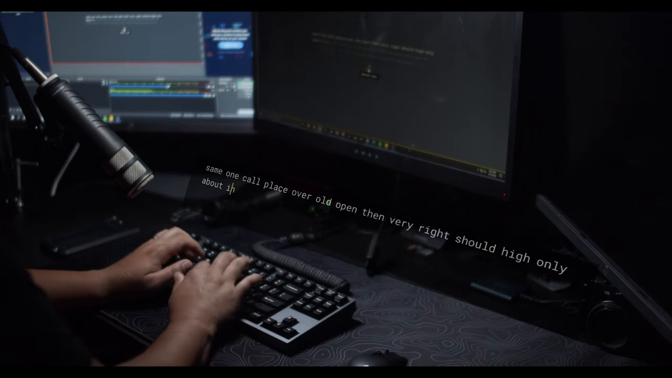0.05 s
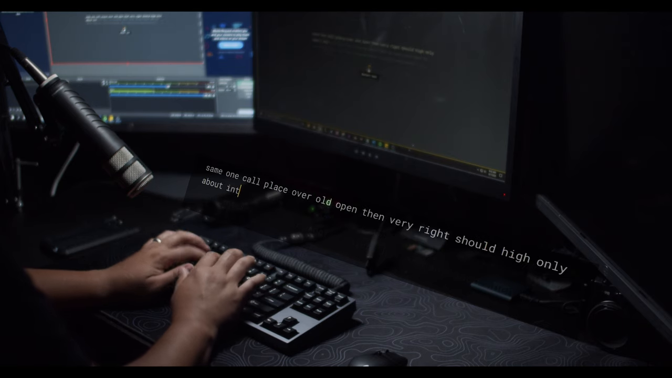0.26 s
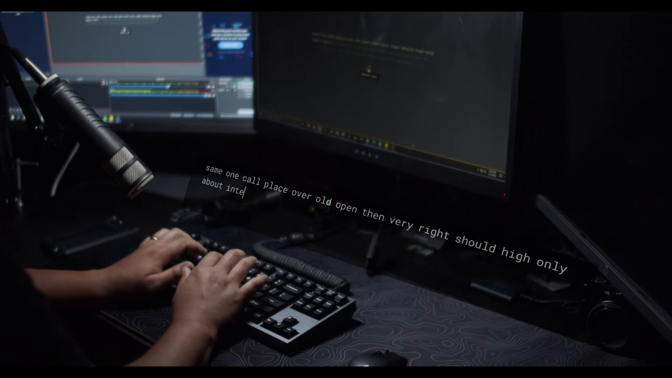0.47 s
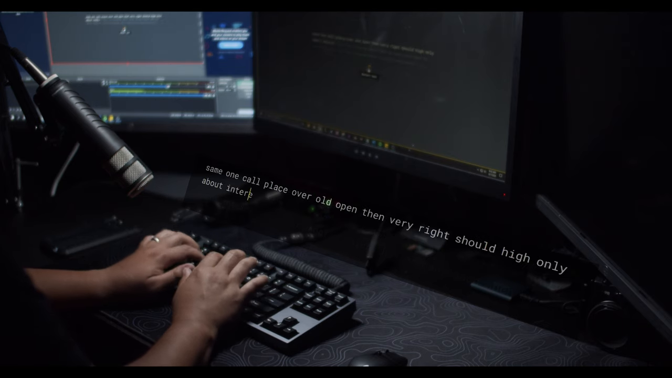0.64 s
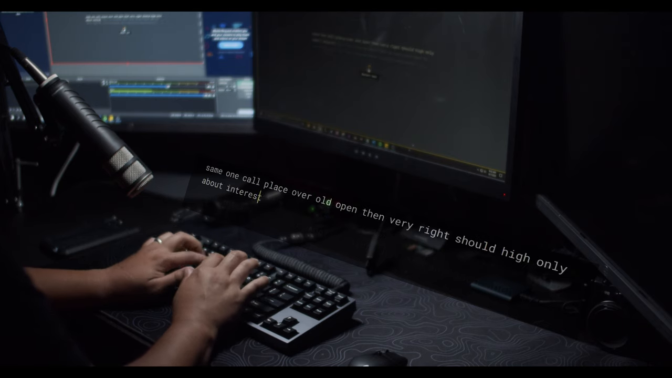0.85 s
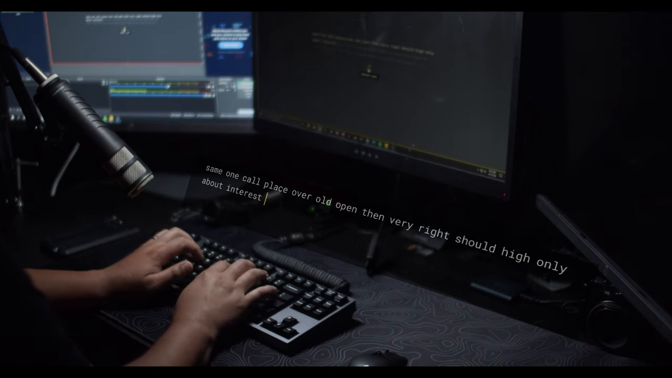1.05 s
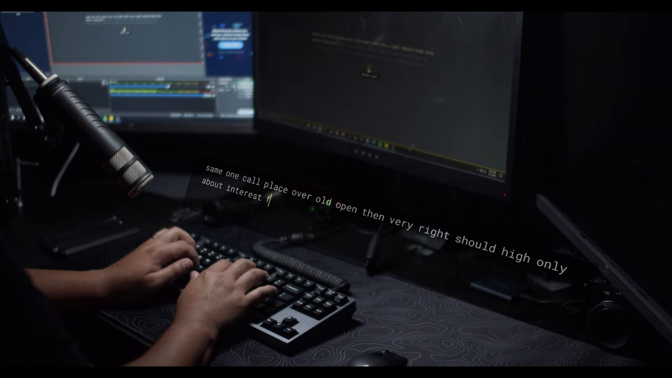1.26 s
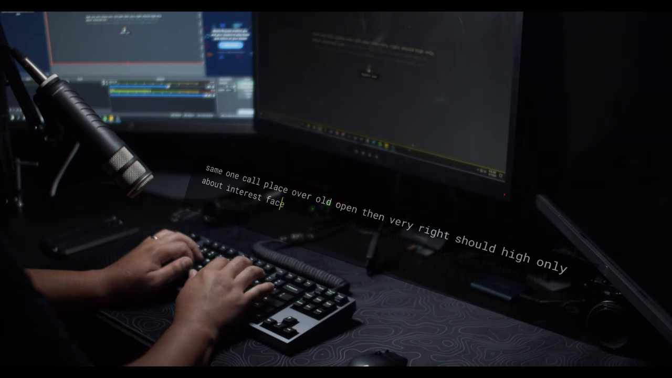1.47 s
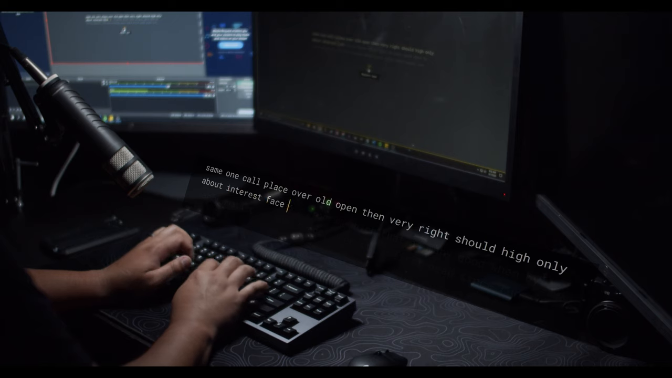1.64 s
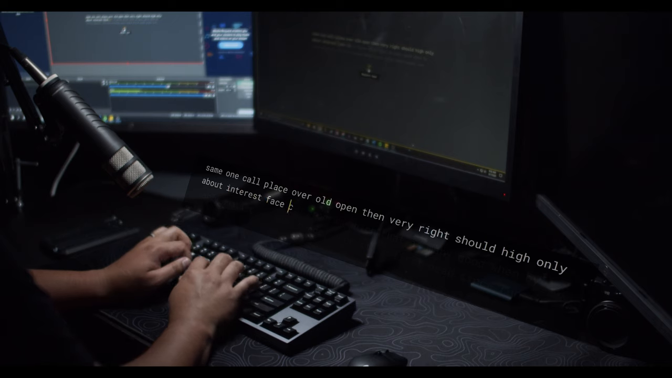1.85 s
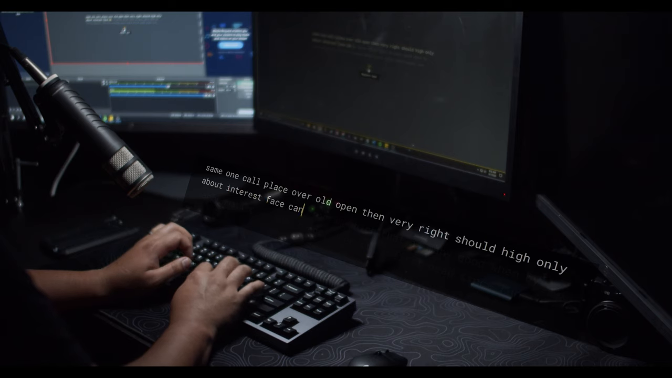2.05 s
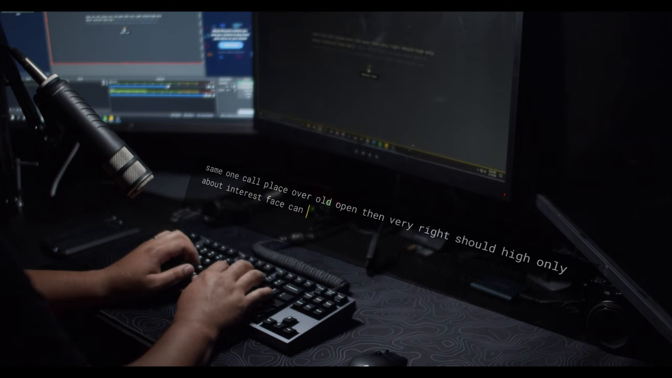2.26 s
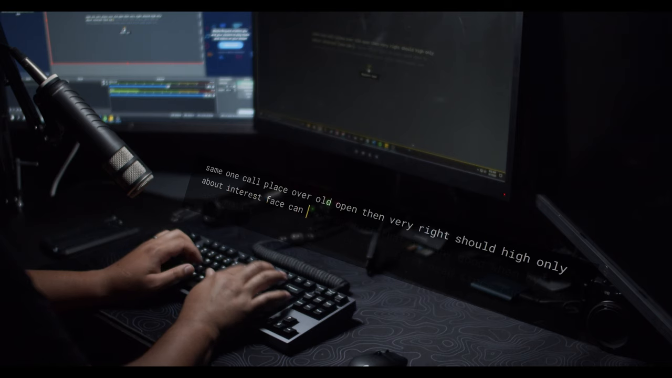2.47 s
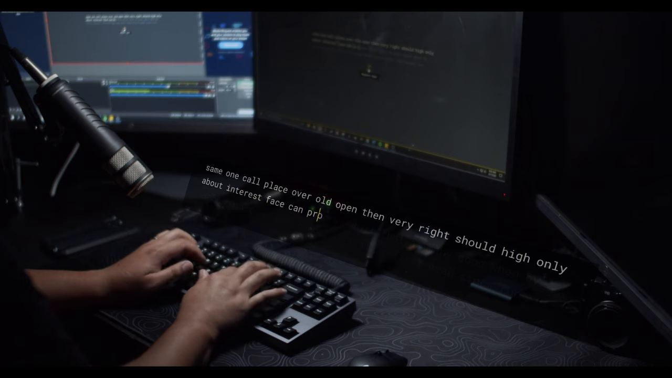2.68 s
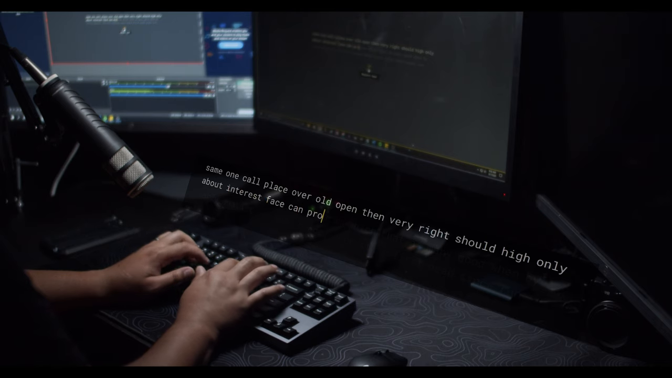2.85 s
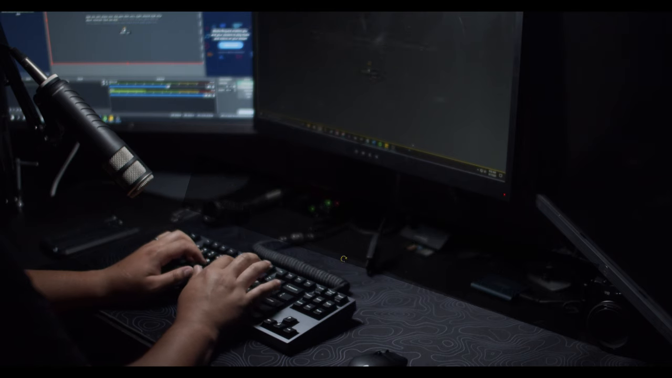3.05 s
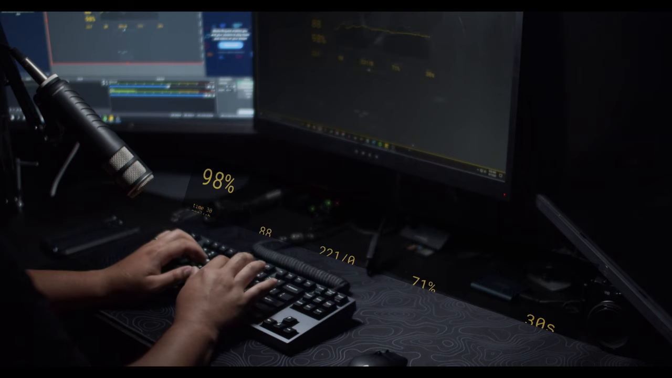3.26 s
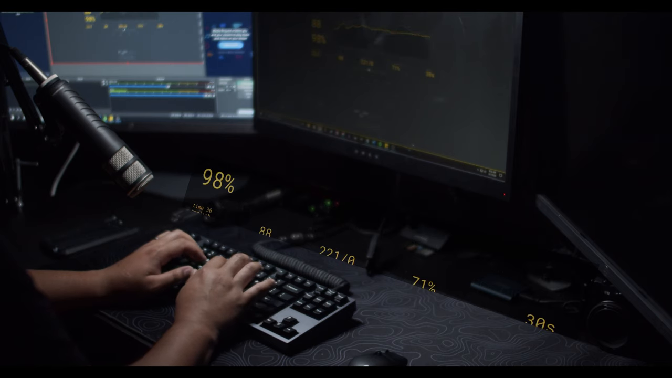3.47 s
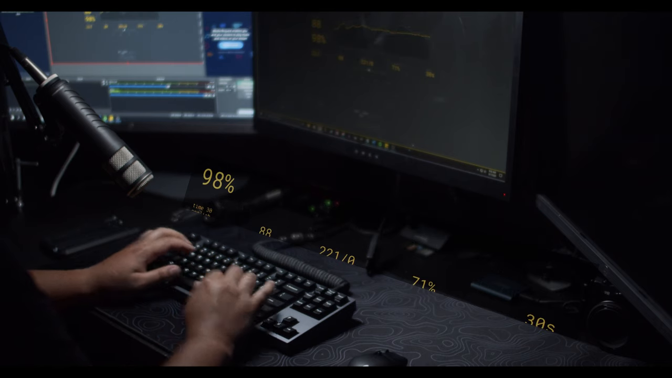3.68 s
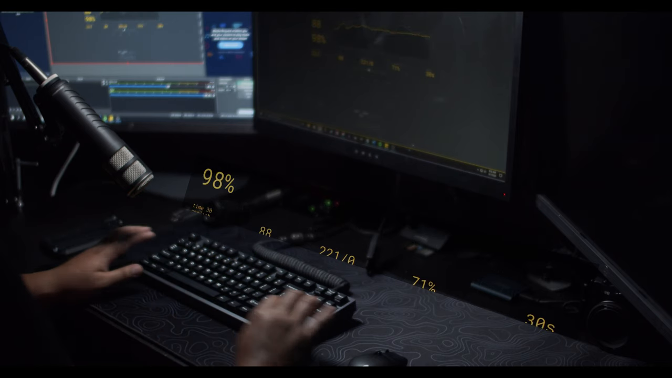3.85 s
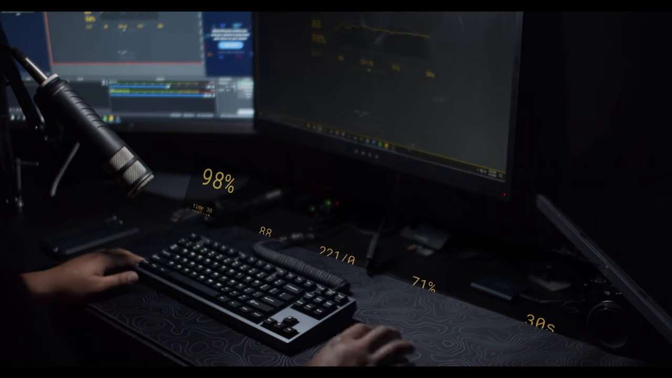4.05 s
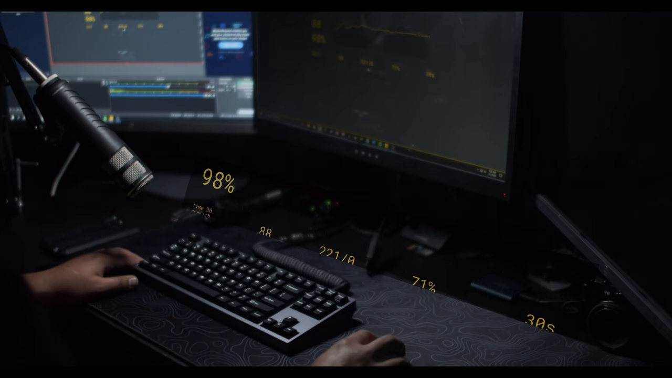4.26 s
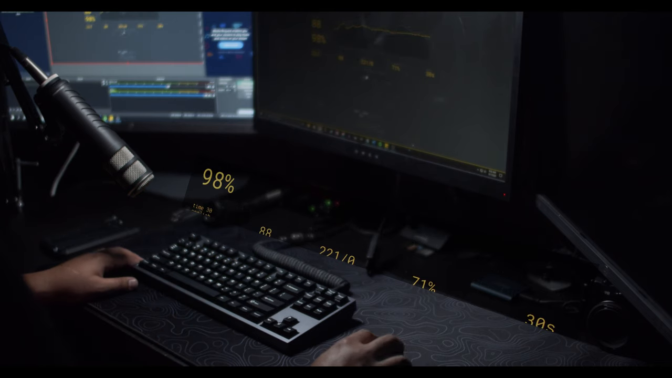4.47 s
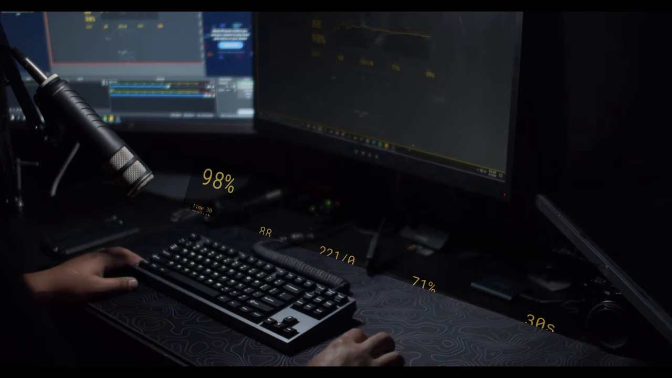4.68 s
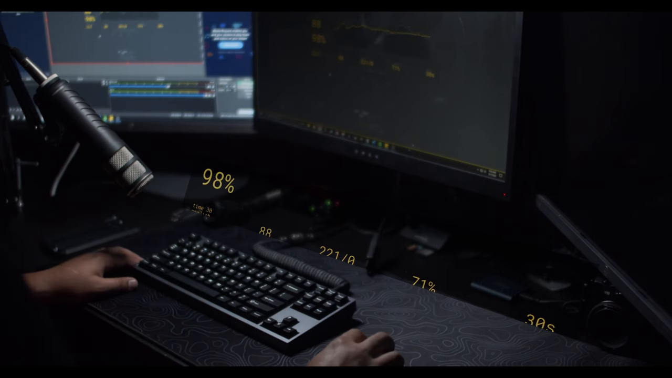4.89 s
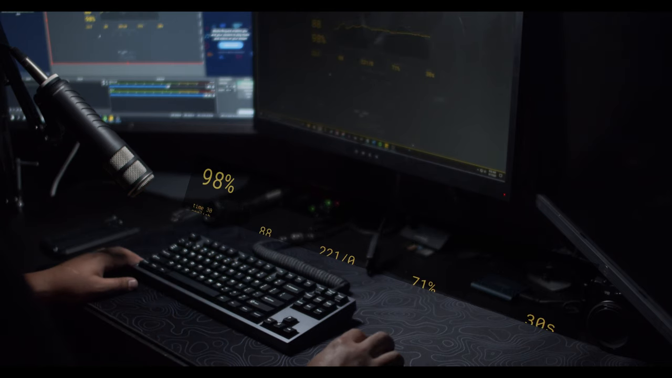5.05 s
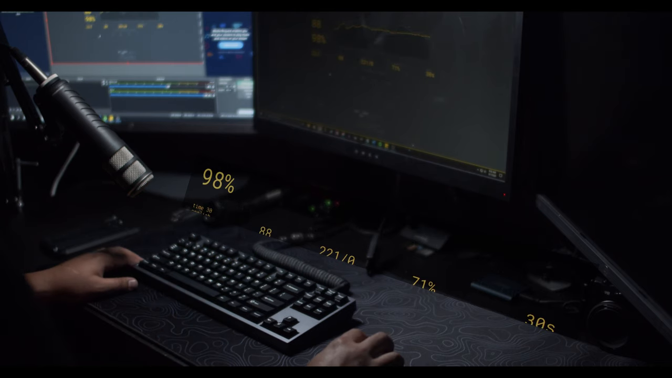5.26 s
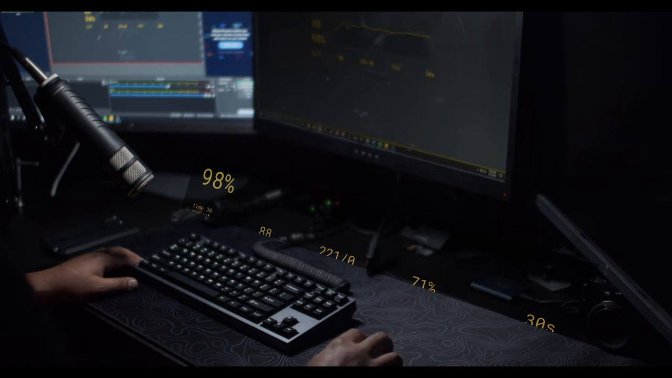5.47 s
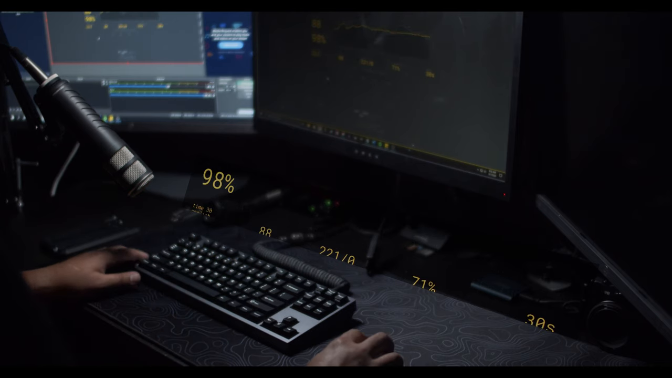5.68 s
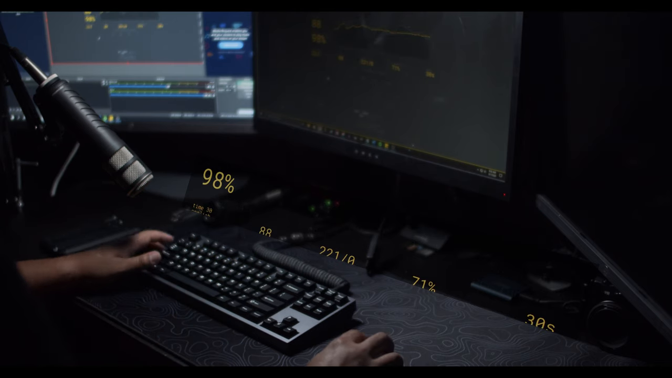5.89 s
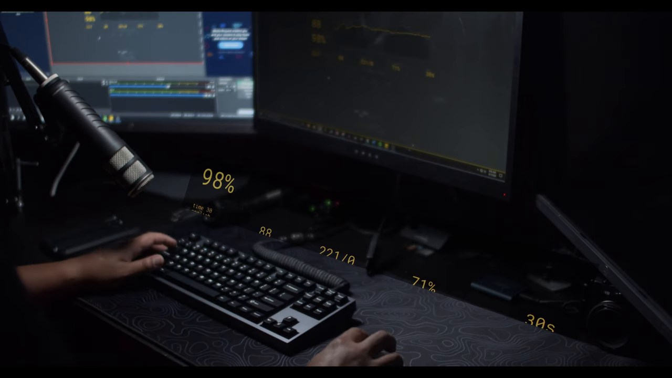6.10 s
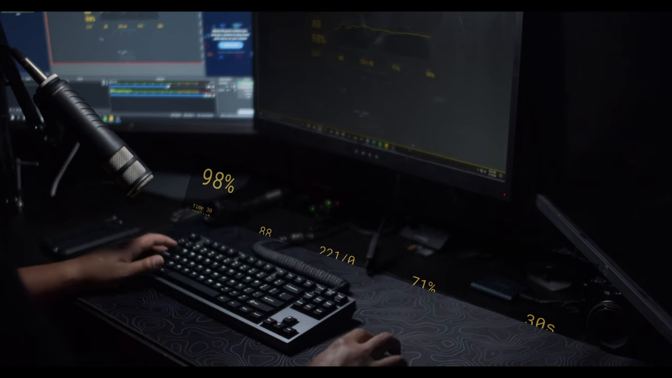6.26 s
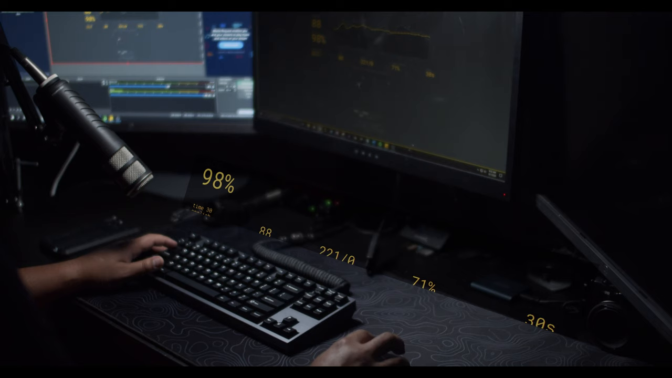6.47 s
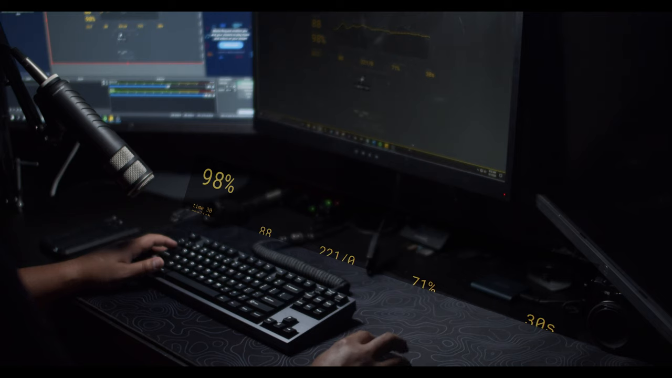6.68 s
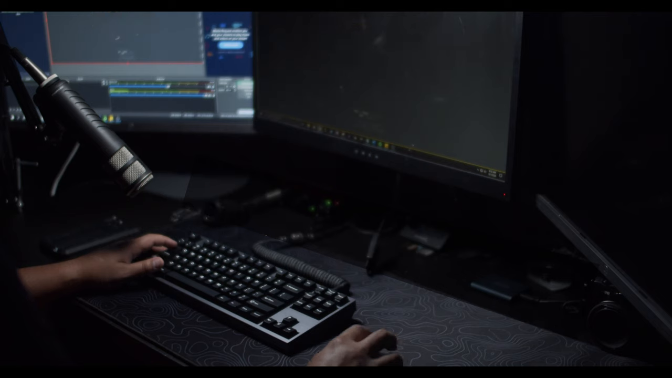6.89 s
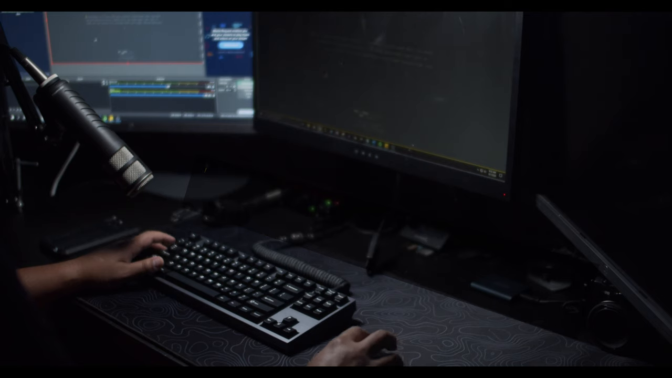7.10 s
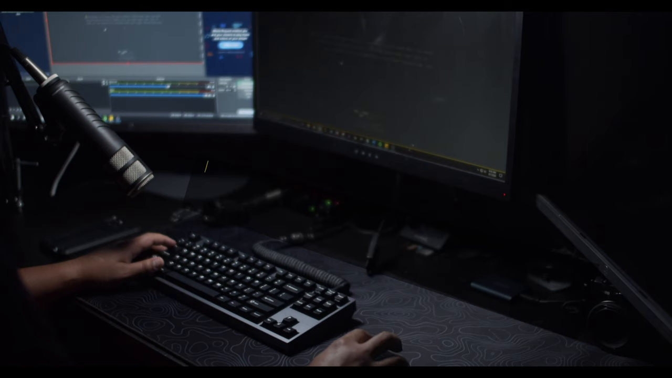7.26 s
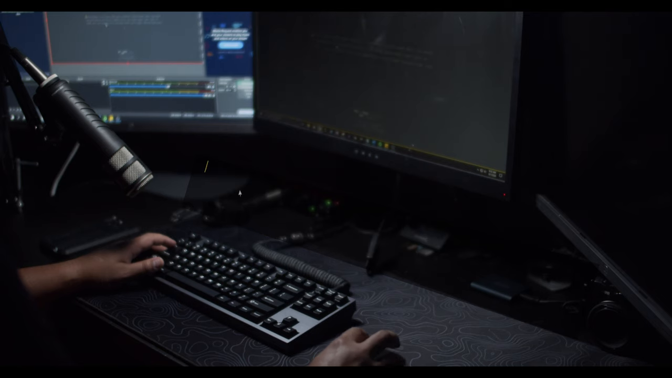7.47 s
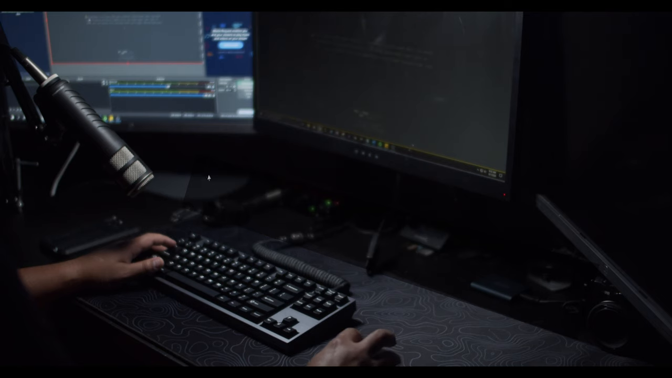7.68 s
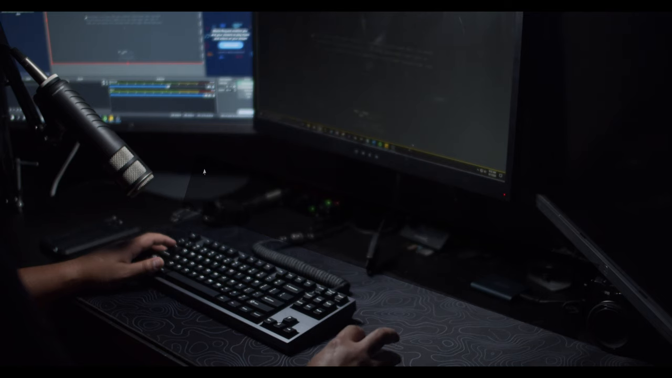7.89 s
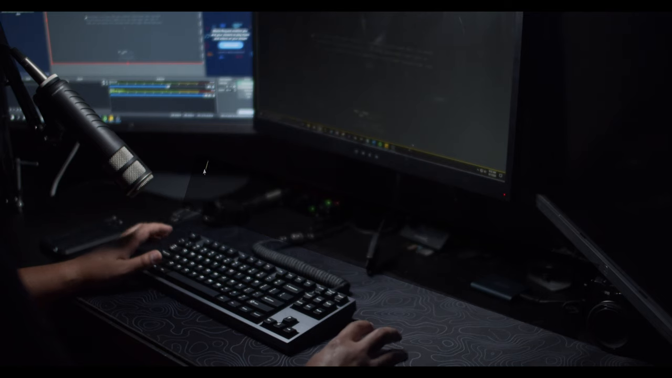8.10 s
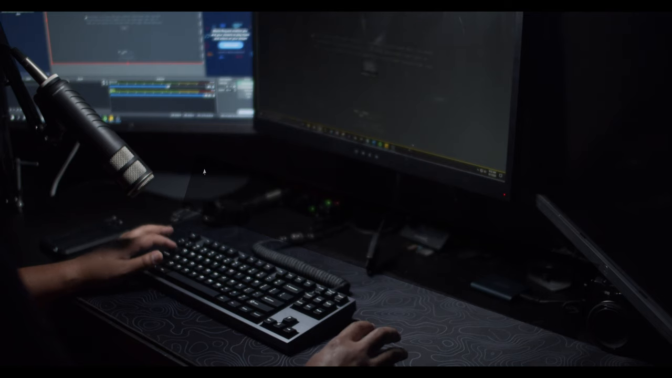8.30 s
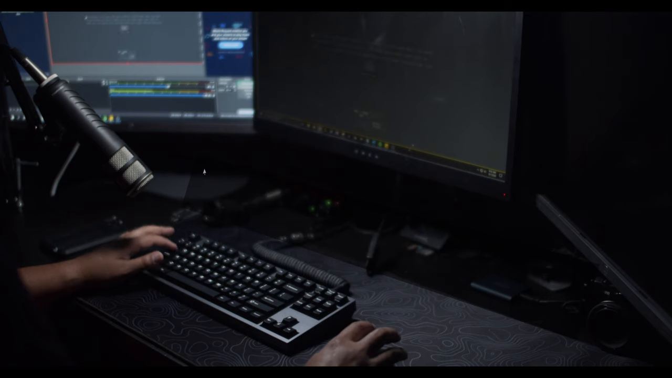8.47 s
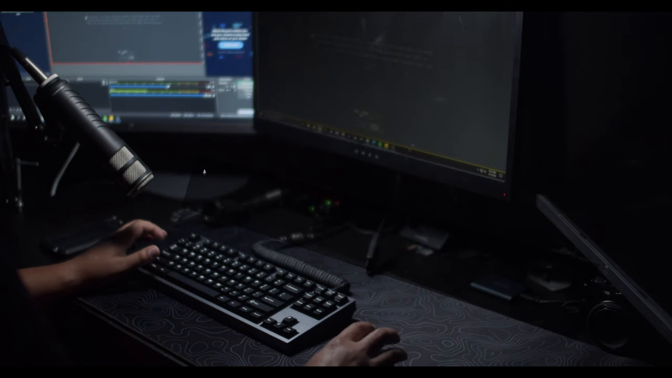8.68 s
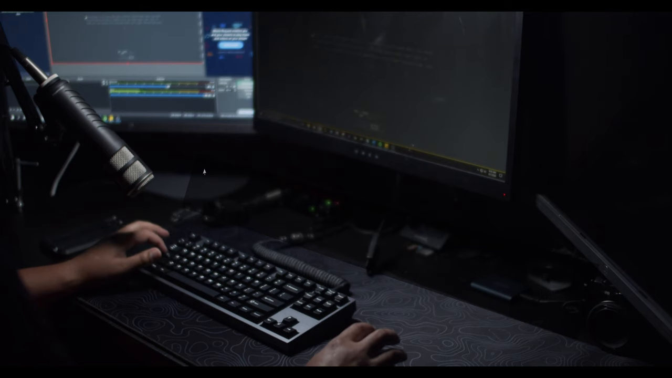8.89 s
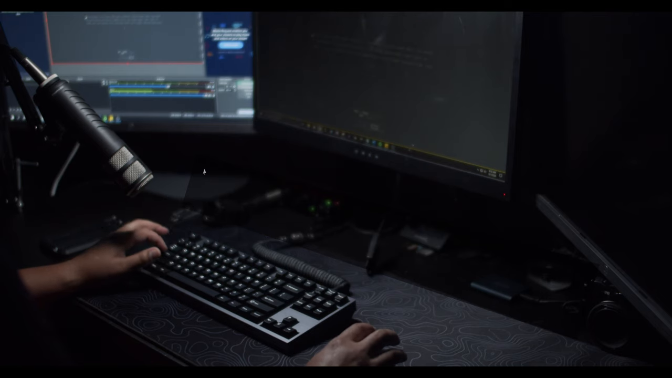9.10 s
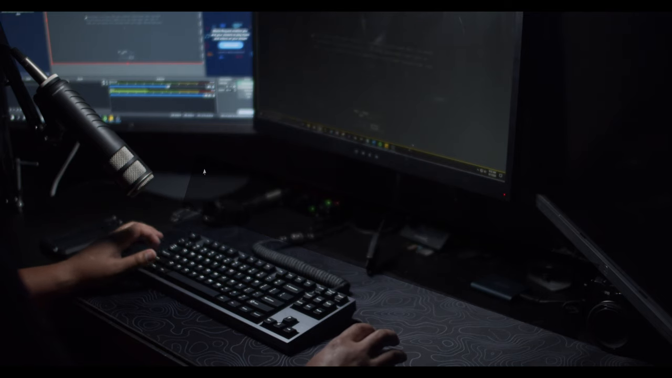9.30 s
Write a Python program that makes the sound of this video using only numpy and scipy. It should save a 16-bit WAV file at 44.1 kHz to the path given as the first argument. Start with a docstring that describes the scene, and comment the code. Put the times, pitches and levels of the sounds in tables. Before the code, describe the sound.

Close, dry mono pickup of a mechanical keyboard in a small quiet room. Rapid, uneven clacks run for almost three seconds, then stop. Hands brush across the mat and drop on the desk with soft thumps and small knocks. After a pause come three separate mouse clicks, one around six seconds and two later, then a short run of evenly spaced, deeper key taps. A faint computer fan and hiss continue underneath.

```python
"""Typing at a quiet desk

Someone types on a mechanical keyboard close to a microphone on a desk arm, in a small quiet room.
Keys, mouse clicks and knocks are short rattles that ring the modes of plastic, metal and wood; thumps
are soft pushes. Hands slide over the desk mat as grainy noise, and blows set desk and arm humming.
A computer fan and microphone hiss lie underneath as steady coloured noise."""
import sys
import numpy as np
from scipy import signal
from scipy.fft import rfft, irfft, next_fast_len
from scipy.io import wavfile
from scipy.ndimage import uniform_filter1d

SR = 44100
rng = np.random.default_rng(int(sys.argv[2]) if len(sys.argv) > 2 else 0)


def int16_out(signal):
    """Quantize to a 16-bit WAV file."""
    q = np.round(np.clip(np.atleast_2d(signal).T, -1, 1) * 32767)
    wavfile.write(sys.argv[1], SR, q.astype(np.int16))


N = 411894   # length in samples

# letter keys tick, bottom out and spring back, one contact per row:
# start_s, keycap_pitch_hz, keycap_level_db, plate_level_db, stem_level_db, housing_level_db
LETTER_CONTACTS = [(0.0397, 2840, -53.5, -61, -68, -67), (0.0559, 2490, -28, -34, -43, -31),
                   (0.119, 2520, -38, -33, -45.5, -42), (0.165, 3120, -54, -45, -60, -56),
                   (0.1754, 2200, -25.5, -33, -36, -36.5), (0.249, 2440, -37, -35, -46, -50.5),
                   (0.343, 2860, -41, -47, -42.5, -50), (0.3596, 2450, -32, -37.5, -41.5, -49),
                   (0.41, 2700, -54.5, -55, -62, -68), (0.449, 2800, -45.5, -38, -46.5, -44.5),
                   (0.519, 2750, -54, -54, -57, -63), (0.5379, 2560, -34.5, -37.5, -49.5, -53),
                   (0.6151, 2830, -44, -51, -46.5, -49), (0.6322, 2880, -31, -35, -38.5, -39),
                   (0.7143, 2630, -41.5, -41, -49, -43.5), (0.729, 3180, -49, -60, -39.5, -48),
                   (0.7542, 2400, -33, -38.5, -37.5, -50), (0.8172, 2710, -60, -57.5, -58, -63),
                   (0.828, 2750, -58, -51, -59, -64), (0.8373, 2460, -29.5, -32.5, -39.5, -43),
                   (0.8654, 3030, -41, -39, -41.5, -42), (0.9323, 2560, -34.5, -35.5, -47.5, -50.5),
                   (1.1722, 2970, -53, -47, -50.5, -59), (1.1822, 2450, -26, -31.5, -34, -41),
                   (1.2578, 3060, -50, -58, -55, -63), (1.266, 2830, -49, -44.5, -58, -62.5),
                   (1.277, 2270, -27.5, -40.5, -34, -45), (1.3679, 2950, -46, -48, -53, -62),
                   (1.3858, 2640, -33, -35, -45, -49), (1.398, 2700, -50, -47, -56, -60),
                   (1.4509, 2790, -39, -58, -44.5, -51), (1.4742, 2550, -32, -39.5, -43.5, -42),
                   (1.533, 2630, -45.5, -41, -61, -74), (1.5621, 2870, -41.5, -37, -39.5, -35.5),
                   (1.588, 2020, -50, -51, -57, -81), (1.8236, 2840, -42.5, -48, -40.5, -56),
                   (1.9054, 2390, -32.5, -44, -38.5, -52), (1.9289, 2880, -42, -34, -44, -51),
                   (1.9972, 2390, -40, -39.5, -51, -53), (2.0066, 2560, -33.5, -38.5, -47, -38.5),
                   (2.0862, 2550, -44, -38, -54, -56), (2.099, 2690, -50, -46, -49.5, -62),
                   (2.196, 2550, -61, -57.5, -69, -74), (2.476, 2820, -51.5, -50, -46.5, -56),
                   (2.488, 2330, -26, -34, -39.5, -39), (2.515, 2660, -54, -54, -61, -68),
                   (2.529, 2360, -48, -54, -59, -68), (2.5501, 2410, -31.5, -35, -48.5, -50),
                   (2.5701, 2770, -27, -32.5, -44, -41.5), (2.6335, 2550, -36.5, -35.5, -45.5, -42),
                   (2.66, 2360, -54, -45, -56, -59), (2.678, 2600, -35, -35.5, -48, -53),
                   (2.7347, 2520, -40, -35, -38.5, -45)]
# keys at the rim (space bar, a corner key), which also knock the case:
# start_s, keycap_pitch_hz, keycap_level_db, plate_level_db, stem_level_db, housing_level_db, case_level_db
RIM_CONTACTS = [(0.9501, 2840, -43, -38.5, -42, -50.5, -42.5),
                (0.9648, 2250, -22.5, -29, -33.5, -46, -32.5),
                (1.0541, 2090, -40.5, -35.5, -46, -50.5, -45.5),
                (1.6358, 2070, -43, -35.5, -41, -55, -35.5), (1.834, 3130, -27, -29.5, -35.5, -45.5, -44.5),
                (2.1272, 2040, -31, -34.5, -43.5, -53.5, -36.5), (2.2407, 2390, -49, -43, -51, -59, -50),
                (8.157, 2410, -44, -49, -48, -56, -49), (8.1664, 2190, -27.5, -29, -29.5, -44, -40),
                (8.231, 2540, -37, -34, -31, -48, -41.5), (8.2926, 2230, -57, -62, -62, -78, -61),
                (8.3149, 2240, -29.5, -35.5, -36.5, -55, -45), (8.381, 2470, -39.5, -36, -35.5, -49, -45.5),
                (8.438, 2420, -63, -68, -64, -76, -65), (8.4623, 2220, -31.5, -34.5, -33.5, -54, -45.5),
                (8.5361, 2550, -39.5, -35.5, -35, -51, -42.5), (8.8222, 2510, -41.5, -52, -42, -57, -48),
                (8.8327, 2300, -26, -29, -37, -54, -43), (8.8978, 2230, -32.5, -31, -29, -45, -38.5),
                (8.9698, 2390, -38.5, -61, -43.5, -52, -62), (8.9876, 2230, -28.5, -32.5, -42, -58, -46.5),
                (9.0355, 2520, -61, -64, -58, -76, -58), (9.0501, 2250, -33, -34.5, -32.5, -49, -43),
                (9.1148, 2370, -44, -55, -44.5, -62, -66), (9.138, 2210, -29, -32, -41.5, -54, -46),
                (9.216, 2150, -40, -36, -38, -55, -43.5)]


def amp(db):
    """dB to gain."""
    return 10 ** (np.asarray(db) / 20)


def rms_one(x):
    """Scale to rms 1."""
    return x / np.sqrt(np.mean(x ** 2) + 1e-20)


def at_hz(points, hz):
    """Read a table of frequency and value on a log-frequency axis."""
    points_hz, values = np.transpose(points)
    return np.interp(np.log(hz), np.log(points_hz), values)


def level(rows, column=1):
    """A dB column as gain in time; silent outside the table."""
    rows = np.array(rows)
    db = np.interp(np.arange(N) / SR, rows[:, 0], rows[:, column], left=-200, right=-200)
    return amp(db)


def resonance(hz, t60, size):
    """Response of one mode on an FFT grid; it radiates little far below its pitch."""
    radius = amp(-60 / (t60 * SR))
    angle = 2 * np.pi * hz / SR
    z = np.exp(-2j * np.pi * np.arange(size // 2 + 1) / size)   # delay of one sample
    return (1 - z * z) / (1 - 2 * radius * np.cos(angle) * z + radius * radius * z * z)


def coloured(spectrum):
    """Noise with the given spectrum, rms 1."""
    size = next_fast_len(N)
    hz = np.maximum(np.arange(size // 2 + 1) * SR / size, 1)
    white = rfft(rng.standard_normal(size))
    return rms_one(irfft(white * amp(at_hz(spectrum, hz)), size)[:N])


def narrow_noise(hz, width_hz):
    """Noise twice through one resonance, rms 1; the width is that of a single pass."""
    size = next_fast_len(N)
    t60 = np.log(1000) / (np.pi * width_hz)
    white = rfft(rng.standard_normal(size))
    return rms_one(irfft(white * resonance(hz, t60, size) ** 2, size)[:N])


def grain(depth_db, size):
    """Quick random swell of level, smoothed over size samples."""
    return amp(depth_db * rms_one(uniform_filter1d(rng.standard_normal(N), size=size)))


def rattles(firmness, length_ms, density):
    """Each contact is one hard click, then loose bounces dying away; firmness is the click's energy share."""
    size = 600
    # bounce energy falls to 1/e in length_ms
    decay_samples = np.maximum(length_ms, .1)[:, None] * 2 * SR / 1000
    fade = np.exp(-np.arange(size) / decay_samples)
    draw = rng.random((len(length_ms), size, 2))
    touches = draw[..., 0] < density
    strength = 2 * draw[..., 1] - 1
    bursts = touches * strength * fade
    share = np.clip(firmness, 0, 1)
    bursts = bursts * np.sqrt((1 - share) / np.sum(bursts ** 2, axis=1))[:, None]
    bursts[:, 0] = -np.sqrt(share)   # the hard click
    return bursts


def strike(s, bursts, db, modes, spread_db, pitch_hz=1, size=4096):
    """The bursts ring every mode, with new strengths for each blow."""
    contact = 2.77   # plastic and skin give: a mode takes up little force above this multiple of its pitch
    force = rfft(bursts, size)
    luck = rng.normal(0, 1, (len(s), len(modes)))
    bins_hz = np.arange(size // 2 + 1) * SR / size
    sound = 0
    for k, (multiple, mode_db, t60) in enumerate(modes):
        hz = multiple * np.reshape(pitch_hz, (-1, 1))
        softness = (1 + 1j * bins_hz / (contact * hz)) ** 2
        rung = force * resonance(hz, t60, size) / softness
        # levels are rms as if all the energy sounded within 2 ms
        energy = 2 * np.sum(np.abs(rung) ** 2, axis=1) / size / (.002 * SR)
        gain = amp(db + mode_db + spread_db * luck[:, k]) / np.sqrt(energy)
        sound = sound + (-1) ** k * rung * gain[:, None]   # neighbours in opposite phase
    out = np.zeros(N + size)
    places = np.round(s * SR).astype(int)[:, None] + np.arange(size)
    np.add.at(out, places, irfft(sound, size))
    return out[:N]


def air():
    """Steady fan rush, room and hiss as coloured noise, with a few blurred fan tones."""
    # fan, room and hiss spectrum: frequency_hz, relative density_db (per Hz)
    air_spectrum = [(24, -42.5), (40, -26), (54, -11.5), (87, -9.5), (121, -2), (160, -3), (200, 1.5),
                    (415, -14), (576, -9.5), (819, -17), (1030, -19), (1540, -23.5), (2420, -29.5),
                    (14100, -35), (16400, -35.5)]
    # blurred fan tones: pitch_hz, width_hz, level_db
    fan_tones = [(576.3, 60, -80.5), (994, 30, -85.5), (1532, 75, -86)]
    rush = amp(-65.5) * coloured(air_spectrum)
    return rush + sum(amp(db) * narrow_noise(hz, width_hz) for hz, width_hz, db in fan_tones)


def shake():
    """Key blows and jolts feed sway and hum, which swell quickly and die back to rest."""
    # hands land on, lean on or leave board and desk: start_s, sway_db, desk_hum_db, arm_hum_db
    jolts = [(0.1, -49, -59, -61), (0.19, -52, -57, -58), (0.37, -46, -55, -64), (0.5, -55.5, -64, -63),
             (0.65, -50.5, -55.5, -57.5), (0.8, -53, -55, -54), (0.97, -49, -61, -59),
             (1.18, -54, -62, -64), (1.42, -60, -57, -70), (1.66, -60.5, -62, -63),
             (1.85, -55.5, -54.5, -61.5), (2.14, -57, -61, -77), (2.5, -47, -49, -60),
             (2.68, -57, -60, -63), (3.6, -54.5, -60, -63), (3.83, -48.5, -59.5, -49),
             (4.01, -44, -43, -61), (4.58, -56, -76.5, -74), (5.65, -73, -46.5, -64), (5.96, -63, -57, -61),
             (7.9, -55, -65, -70), (8.17, -56, -58, -54.5), (8.33, -67, -65, -70), (8.47, -61, -68, -64),
             (8.83, -56, -53, -73), (8.89, -66, -56, -75), (9.04, -55, -50, -73)]
    # slow sway of the arm, desk hum, arm hum:
    # pitch_hz, width_hz, rest_level_db, key_blow_db (added to the plate level), rise_s, t60_s
    shakers = [(12.92, 8, -67, -24, 0.023, 0.74), (69.6, 17, -76.5, -27, 0.017, .4),
               (117.9, 22, -74, -31.5, 0.018, 0.26)]
    contacts = LETTER_CONTACTS + RIM_CONTACTS
    key_s, key_db = np.transpose([(row[0], row[3]) for row in contacts])
    jolt_s, *jolts_db = np.transpose(jolts)
    out = 0
    for jolt_db, (hz, width_hz, rest_db, blow_db, rise_s, t60) in zip(jolts_db, shakers):
        energy = np.full(N, 1e-18)
        energy[(key_s * SR).astype(int)] += amp(key_db + blow_db) ** 2
        energy[(jolt_s * SR).astype(int)] += amp(jolt_db) ** 2
        rise = np.exp(-1 / (rise_s * SR))
        keep = amp(-120 / (t60 * SR))   # energy kept per sample
        energy = signal.lfilter([1 - rise], np.convolve([1, -rise], [1, -keep]), energy)
        out = out + np.sqrt(energy + amp(rest_db) ** 2) * narrow_noise(hz, width_hz)
    return out


def keys(rows, case_db, plate_hz, stem_hz, pitch_spread, edge_db, loose_ms_per_db, firmness):
    """One rattle per contact rings case, plate, keycap, stem and housing together."""
    # parts that all keys share: pitch_hz, relative level_db, t60_s
    case_modes = [(189.2, -14, 0.023), (310, -8, 0.15), (396, -5.5, 0.027), (413, -2.5, 0.067),
                  (546, -8.5, 0.012), (646, -4, 0.025), (5000, -16, 0.034)]
    housing_modes = [(7790, -11.5, 0.0013), (9600, -3.5, 0.003), (10430, -2.5, 0.00383),
                     (11280, -9.5, 0.0045)]
    edge_modes = [(11950, -1.5, .003), (14300, -13.5, .003)]
    # parts whose pitch goes with the key and its place: pitch_multiple, relative level_db, t60_s
    plate_modes = [(.55, -12.5, .014), (.78, -6.5, 0.0064), (1, -1.5, 0.0082), (1.2, -4.5, 0.0061)]
    keycap_modes = [(.8, -5.5, 0.0033), (1, -1.5, 0.006), (1.17, -6.5, 0.0062), (1.36, -10.5, 0.0079)]
    stem_modes = [(.82, -6.5, 0.0038), (1.001, -5.5, 0.0046), (1.15, -5, 0.0023), (1.298, -8, 0.0033),
                  (1.48, -16.5, 0.0032)]
    s, cap_hz, cap_db, plate_db, stem_db, housing_db = rows
    place = 1 + pitch_spread * rng.normal(0, 1, (len(s), 2))
    hard_db = cap_db + 35             # above the usual keycap level of -35 dB
    loose_db = stem_db - cap_db + 9   # above the usual stem level, 9 dB under the keycap
    # harder blows rattle for less time
    length_ms = 1.7 - 0.09 * hard_db + loose_ms_per_db * loose_db
    bursts = rattles(firmness, length_ms, density=.15)
    # a harder blow rings the plate higher, by 7.5 Hz per dB before the spread
    plate_pitch_hz = (plate_hz + 7.5 * hard_db) * place[:, 0]
    small_parts = [(housing_db, housing_modes, 1), (stem_db + edge_db, edge_modes, 1),
                   (plate_db, plate_modes, plate_pitch_hz), (cap_db, keycap_modes, cap_hz),
                   (stem_db, stem_modes, stem_hz * place[:, 1])]
    out = strike(s, bursts, case_db, case_modes, spread_db=1.5)
    for db, modes, hz in small_parts:
        out = out + strike(s, bursts, db, modes, spread_db=1.5, pitch_hz=hz, size=2048)
    return out


def keyboard():
    """Letter keys barely stir the case; rim keys knock it."""
    letters = np.transpose(LETTER_CONTACTS)
    *rim, rim_case_db = np.transpose(RIM_CONTACTS)
    letter_case_db = letters[3] - 24.5   # under the plate
    letter_sound = keys(letters, letter_case_db, plate_hz=1179.5, stem_hz=4749.5, pitch_spread=0.12,
                        edge_db=-16.5, loose_ms_per_db=-0.04, firmness=0.69)
    rim_sound = keys(rim, rim_case_db, plate_hz=1359.5, stem_hz=5201, pitch_spread=0.05,
                     edge_db=-15, loose_ms_per_db=-0.03, firmness=0.62)
    return letter_sound + rim_sound


def slides():
    """Fibres catch and let go: grainy noise in shared jerks, with separate grain for body and treble."""
    # skin and sleeve on the mat, one list per slide: start_s, body_level_db, treble_level_db
    strokes = [
        [(3.5, -82.5, -86.5), (3.586, -66, -68.5), (3.658, -56.5, -61.5), (3.818, -53.5, -57.5),
         (3.876, -59, -63.5), (3.982, -78, -82)],
        [(3.99, -83, -86), (4.002, -70, -71), (4.05, -70.5, -72), (4.07, -78, -95), (4.13, -75, -82),
         (4.24, -85, -92)],
        [(5.6, -103, -97), (5.62, -70, -78), (5.73, -63.5, -65.5), (5.814, -61.5, -64), (5.924, -64.5, -73),
         (5.96, -80, -82)],
        [(9.22, -54, -68.5), (9.234, -71.5, -80), (9.308, -64, -71), (9.34, -65.5, -75)],
    ]
    # spectra of the two layers: frequency_hz, relative density_db (per Hz)
    body_spectrum = [(250, -24), (420, 2.5), (800, -3.5), (1300, 3), (2200, -1.5), (3500, 0), (5200, -5.5),
                     (7000, -17), (16000, -46)]
    treble_spectrum = [(2000, -25), (5000, -3.5), (7000, -6.5), (9000, -4.5), (11000, -8.5), (13000, -16),
                       (16000, -16)]
    jerks = grain(0.72, size=1500)
    body = rms_one(jerks * grain(0.63, size=400) * coloured(body_spectrum))
    treble = rms_one(jerks * grain(0.84, size=150) * coloured(treble_spectrum))
    return sum(level(rows) * body + level(rows, column=2) * treble for rows in strokes)


def thumps():
    """A palm drops on the desk: a soft half-sine push sets the low desk and arm modes going."""
    # palm drops: start_s, level_db, push_length_ms
    drops = [(3.545, -47.5, 3.6), (3.829, -48, 2.8), (3.996, -36.5, 3.4), (4.011, -40.5, 6),
             (4.045, -41, 5.1), (5.642, -52, 5.4), (5.66, -51, 6.2)]
    # low modes of desk and arm: pitch_hz, relative level_db, t60_s
    desk_modes = [(51.4, -5.5, 0.1), (69.7, 0.5, 0.62), (106, -0.5, 0.13)]
    s, db, push_ms = np.transpose(drops)
    phase = np.arange(500) / (push_ms[:, None] * SR / 1000)
    push = np.sin(np.pi * np.minimum(phase, 1))
    return strike(s, push, db, desk_modes, spread_db=4.0, size=32768)


def knocks():
    """Small hard touches rattle on the desk top and ring its hollow, knocking and cracking modes."""
    # a knuckle or the mouse knocks: start_s, rattle_length_ms, hollow_level_db, knock_level_db, crack_level_db
    touches = [(3.578, 1.9, -43.5, -49, -70), (3.596, 3.0, -43, -72, -73), (3.8225, 2.2, -50, -38.5, -32.5),
               (3.9931, 0.72, -55, -40, -75), (4.022, 1.5, -60, -67, -56), (5.992, 1.6, -69, -55, -66)]
    # desk top under a knock: pitch_hz, relative level_db, t60_s
    hollow_modes = [(338, -5, 0.0046), (395, -2, 0.078)]
    knock_modes = [(630, -8.5, 0.011), (900, -4.5, 0.0065), (1270, -11, 0.014)]
    crack_modes = [(2040, -12, 0.0071), (2770, -13, 0.0041), (4420, -34, .004)]
    s, length_ms, *part_db = np.transpose(touches)
    bursts = rattles(0.43, length_ms, density=0.18)
    parts = zip(part_db, (hollow_modes, knock_modes, crack_modes))
    return sum(strike(s, bursts, db, modes, spread_db=2.0) for db, modes in parts)


def mouse():
    """The metal switch leaf snaps and chatters in the plastic shell."""
    # button down, creak before release, up:
    # start_s, rattle_length_ms, shell_level_db, leaf_level_db, pitch_factor
    clicks = [(5.9672, 1.7, -42, -59, 0.98), (6.041, 3.0, -58, -71, 0.46), (6.0523, 1.04, -37.5, -51, 0.97),
              (6.616, 1.8, -41, -56, 0.98), (6.667, 3.3, -58, -75, 0.41), (6.6783, 1.44, -39, -48, 1),
              (7.778, 1.6, -42, -65, 0.957), (7.833, 3.3, -65, -75, 0.44), (7.8442, 2, -39, -61, 0.97)]
    # mouse shell and switch leaf: pitch_hz (before the pitch factor), relative level_db, t60_s
    shell_modes = [(905, -13.5, 0.022), (1570, -17, 0.045), (2070, -18, 0.01), (3680, -14, 0.0026),
                   (4870, -10.5, 0.014), (5700, -12, 0.0038), (7400, -10.5, 0.011), (9430, -14.5, 0.0057),
                   (10400, -18, .008), (11540, -11, .01), (13600, -15, 0.0019)]
    leaf_modes = [(4770, -7, 0.057), (4780, -12, .07), (7200, -12, 0.087), (7560, -9.5, .08),
                  (9190, -6, 0.043), (11100, -13, .05), (12300, -11.5, .05)]
    s, length_ms, shell_db, leaf_db, pitch_factor = np.transpose(clicks)
    bursts = rattles(0.093, length_ms, density=0.23)
    shell = strike(s, bursts, shell_db, shell_modes, spread_db=2.5, pitch_hz=pitch_factor)
    leaf = strike(s, bursts, leaf_db, leaf_modes, spread_db=3.5, pitch_hz=pitch_factor)
    return shell + leaf


def room(x):
    """Dense reflections from desk, screen and walls: each band's energy returns as noise that dies away."""
    # decay of the room: frequency_hz, t60_s
    tail_t60 = [(300, 0.2), (800, 0.21), (2000, 0.12), (5000, 0.22), (12000, .15)]
    # strength of the room: frequency_hz, level_db (relative to the sound sent in)
    tail_db = [(300, -22), (800, -17.5), (2000, -17), (5000, -22.5), (12000, -22)]
    edges_hz = 200 * 2 ** np.arange(0, 6.6, .5)   # half-octave bands
    white = rng.standard_normal((2, N))           # neighbouring bands take different noise
    out = 0
    for k, (low, high) in enumerate(zip(edges_hz, edges_hz[1:])):
        hz = np.sqrt(low * high)
        band = signal.butter(2, [low, high], "band", fs=SR, output="sos")
        keep = amp(-120 / (at_hz(tail_t60, hz) * SR))   # energy kept per sample
        energy = signal.lfilter([1 - keep], [1, -keep], signal.sosfilt(band, x + 1e-18) ** 2)
        noise = rms_one(signal.sosfilt(band, white[k % 2]))
        out = out + amp(at_hz(tail_db, hz)) * np.sqrt(energy) * noise
    return out


def scene():
    """Everything at the microphone, in mono."""
    near, far = keyboard() + knocks(), mouse()
    # the mouse is further off and gets 7.5 dB more room
    hits = near + far + room(near + amp(7.5) * far)
    return (hits + thumps() + shake() + slides() + air())[None]


def record(dry):
    """A steep low-pass cuts the top, 60 dB down from 16550 Hz upward."""
    low_pass = signal.cheby2(12, 60, 16550, fs=SR, output="sos")
    return signal.sosfilt(low_pass, dry)


dry = scene()
out = record(dry)
int16_out(out)
```